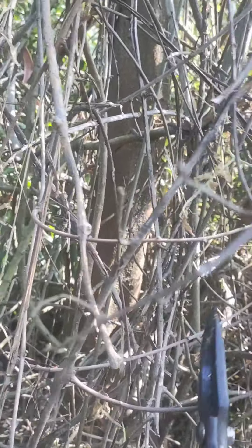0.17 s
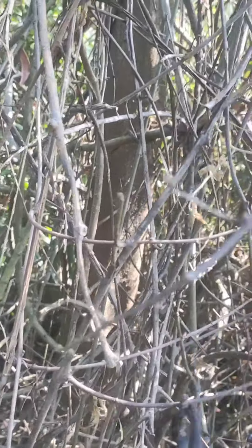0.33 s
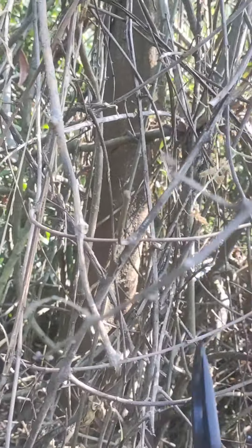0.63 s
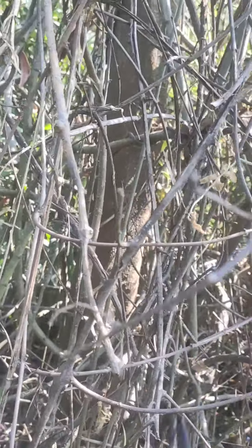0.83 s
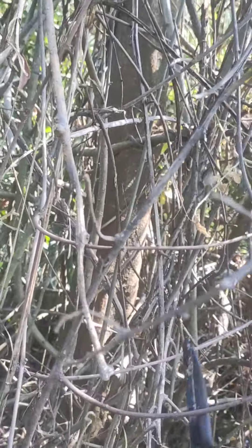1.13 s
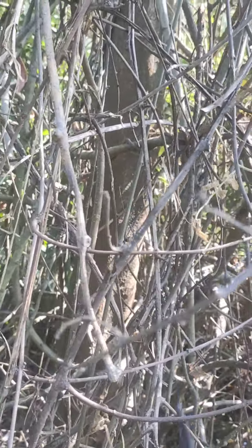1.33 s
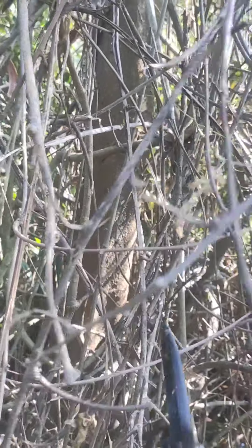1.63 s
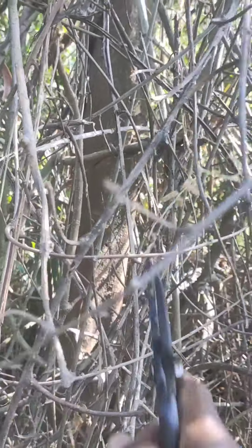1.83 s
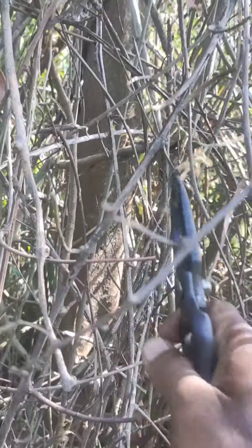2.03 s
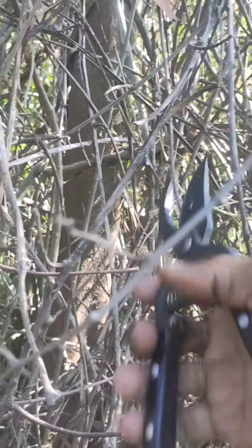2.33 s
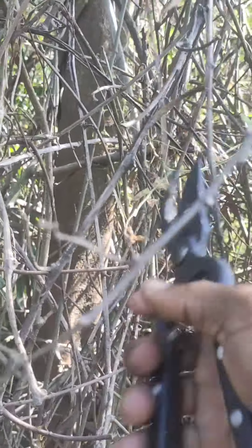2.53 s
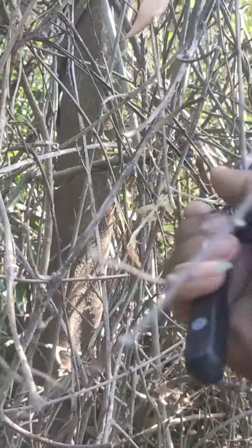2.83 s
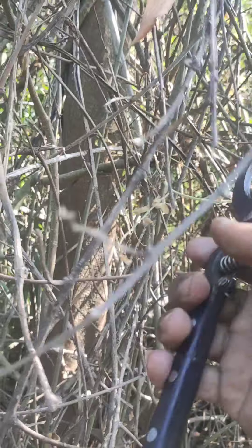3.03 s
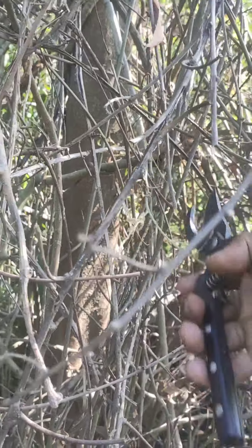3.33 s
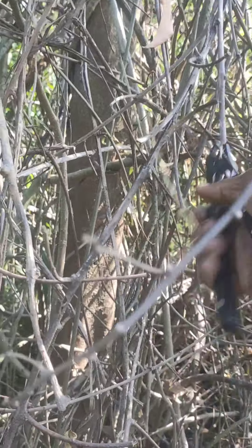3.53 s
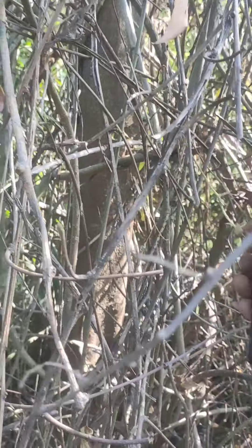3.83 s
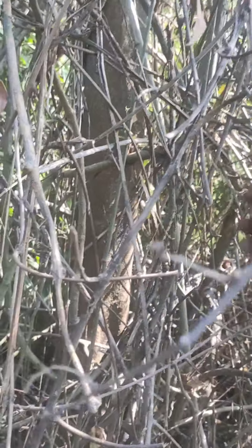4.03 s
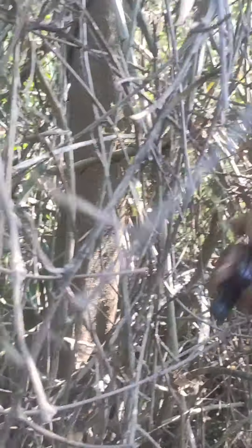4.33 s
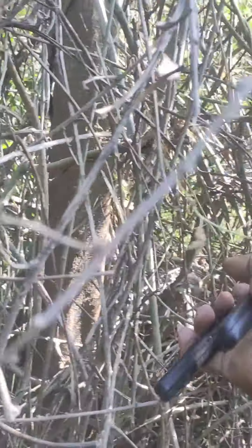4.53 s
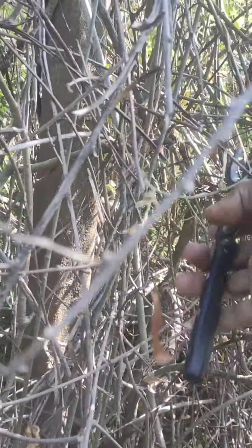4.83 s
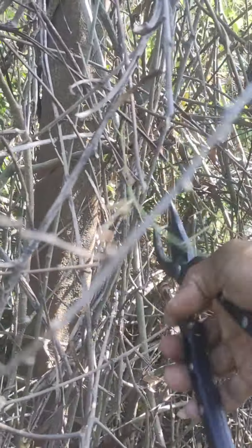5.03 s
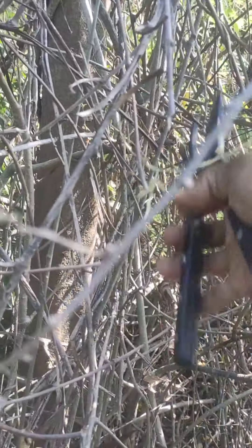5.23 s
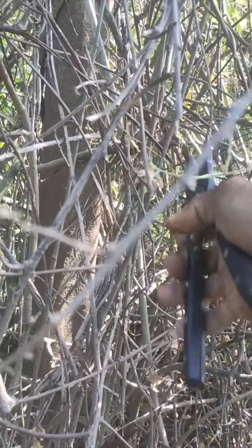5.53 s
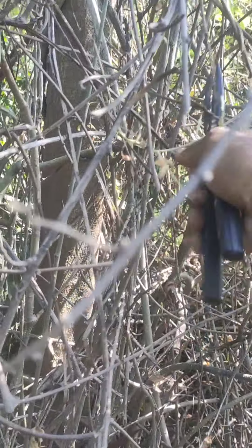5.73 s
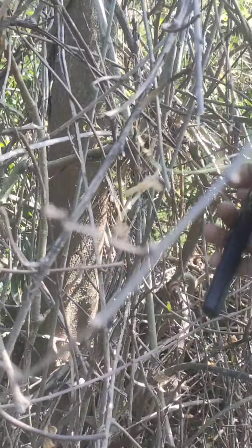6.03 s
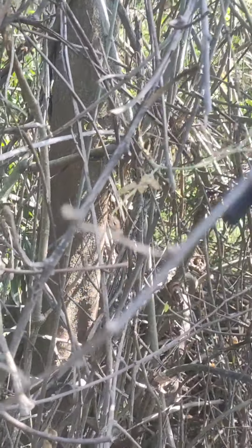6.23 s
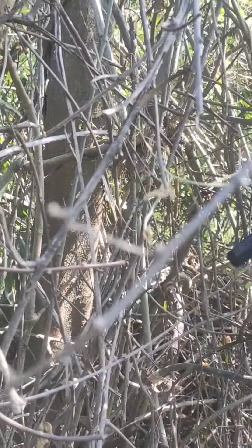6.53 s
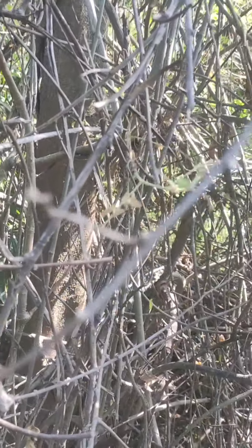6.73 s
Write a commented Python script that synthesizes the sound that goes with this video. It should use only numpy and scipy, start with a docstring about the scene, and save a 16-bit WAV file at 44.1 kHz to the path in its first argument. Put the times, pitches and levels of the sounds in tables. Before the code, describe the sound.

Bright, dry snips of pruning shears, recorded very near in dense dry brush. Three clean empty clacks come quickly, then nine more closings, mostly with small crunching bites and splitting wood just before the metal stops meet. Papery rustling swells between them, with scattered spring and twig ticks. A steady thin insect chorus fades slightly while a nearer pulsing buzz grows, then stops; faint open-air rumble underneath.

```python
"""In a thicket, hand shears snip twigs close to a two-port microphone.
Knocks (edge bites, wood cracks, handles clack shut and rebound) are noise bursts rung through damped modes.
Dry stems rustle as grainy noise; twigs and the coil spring tick; jolts thud; stems scatter a short tail.
Two insect songs, narrow bands of noise, lie over far rumble and hiss.
A gain control turns the sound down briefly after low-mid peaks such as thuds; the top band is limited."""
import sys
import numpy as np
from scipy import signal
from scipy.fft import rfft, irfft
from scipy.io import wavfile
from scipy.ndimage import uniform_filter1d, minimum_filter1d

SR = 44100
rng = np.random.default_rng(int(sys.argv[2]) if len(sys.argv) > 2 else 0)


def bounce(signal):
    """Save signal as a 16-bit WAV file at the path given by the first command-line argument."""
    frames = np.transpose(np.atleast_2d(signal))
    limited = np.clip(frames, -1, 1)
    pcm = np.round(limited * 32767).astype(np.int16)
    wavfile.write(sys.argv[1], SR, pcm)


N = 303849
BURST_SAMPLES, PEAK_SAMPLE = 2048, 768
BURST_HZ = np.fft.rfftfreq(BURST_SAMPLES, 1 / SR)


def amp(db):
    """Decibels to gain."""
    return 10 ** (np.asarray(db) / 20)


def evened(x):
    """Scales to rms 1."""
    return x / np.sqrt(np.mean(x ** 2) + 1e-20)


def read_spectrum(points, hz):
    """Interpolates a spectrum table over log frequency."""
    f, value = np.transpose(points)
    return np.interp(np.log(hz + 1), np.log(f + 1), value)


def level_curve_db(rows):
    """A (time, level) table at every sample."""
    s, db = np.transpose(rows)
    return np.interp(np.arange(N) / SR, s, db)


def band(hz, centre_hz, width_hz, steepness):
    """Response of a damped mode, raised to a power."""
    damping = 1j * hz * width_hz
    return (damping / (centre_hz ** 2 - hz ** 2 + damping)) ** steepness


# left-right likeness of steady noise: (frequency [Hz], likeness [0-1])
NOISE_LIKENESS = [(130, .95), (290, .86), (640, .66), (1410, .21), (3100, 0)]


def noise(gain, patchy_db, size):
    """Stereo noise, rms 1: random short-time spectra with drifting patches; gain is a function of Hz."""
    frames, hz = 4 * N // size + 5, np.fft.rfftfreq(size, 1 / SR)
    a, b, c, d, patches = rng.standard_normal((frames, len(hz), 5)).T
    patches = uniform_filter1d(patches, size=9, axis=0)  # over frequency
    patches = evened(uniform_filter1d(patches, size=12, axis=1))  # over time
    same = read_spectrum(NOISE_LIKENESS, hz)[:, None]
    left = a + 1j * b
    right = same * left + np.sqrt(1 - same ** 2) * (c + 1j * d)
    spectra = np.array([left, right]) * gain(hz)[:, None] * amp(patchy_db * patches)
    return evened(signal.istft(spectra, nperseg=size, noverlap=size * 3 // 4)[1][:, :N])


def bursts(rise_ms, t60_ms, ring, same, db, pan_db, spiky_db=5, step_db=6, snap=7):
    """Tiny slips swell (60 dB per rise), snap and die away, heard through ring; one stereo burst a row."""
    ms = (np.arange(BURST_SAMPLES) - PEAK_SAMPLE) * 1000 / SR
    stroke_db = np.where(ms < 0, 60 * ms / rise_ms - step_db, -60 * ms / t60_ms)
    a, b, grain = rng.standard_normal((len(db), 3, BURST_SAMPLES)).transpose(1, 0, 2)
    slips = amp(stroke_db) * amp(spiky_db * evened(uniform_filter1d(grain, size=12)))
    left = a + snap * (ms == 0)  # the moment the fibres or stops give
    right = same * left + np.sqrt(1 - same ** 2) * b
    sound = irfft(rfft(slips * np.array([left, right])) * ring)
    around_peak = sound[..., PEAK_SAMPLE - 25:PEAK_SAMPLE + 105]
    sound /= np.sqrt(np.mean(around_peak ** 2, -1, keepdims=True))
    side_db = np.outer([.5, -.5], pan_db * np.ones(len(db)))
    return sound * amp(db + side_db)[..., None]


def placed(times, sounds):
    """Lays bursts out with their peaks at the given times."""
    out = np.zeros((2, N + BURST_SAMPLES))
    for k, s in enumerate(times):
        out[:, round(s * SR):][:, :BURST_SAMPLES] += sounds[:, k]
    return out[:, PEAK_SAMPLE:PEAK_SAMPLE + N]


# relative spectrum of rumble and hiss: (frequency [Hz], density [dB per Hz])
AIR_SPECTRUM = [(20, -6.5), (35, -22), (60, 0.5), (110, -4), (200, -13), (400, -19), (735, -25.5),
                (1100, -23), (2300, -27.5), (5000, -30.5), (16000, -50)]
AIR_DB = -55.5


def open_air():
    """Far rumble and hiss: steady shaped noise."""
    return amp(AIR_DB) * noise(lambda hz: amp(read_spectrum(AIR_SPECTRUM, hz)) * (hz > 15),
                               patchy_db=1.0, size=2048)


# far insects: (time [s], level [dB])
CHORUS_LEVEL = [(0, -57), (2.7, -61.5), (6.89, -63.5)]
# a nearer insect: (time [s], level [dB])
SINGER_LEVEL = [(0, -73.5), (2.1, -75.5), (2.25, -70.5), (3.3, -67.5), (4.4, -62.5), (6.15, -57.5),
                (6.25, -70), (6.89, -82)]


def insect(rows, centre_hz, width_hz, throb_hz, throb_db, peak_s, buzz_hz, buzz_db):
    """A narrow band of noise that throbs and buzzes with the wing strokes."""
    song = noise(lambda hz: np.exp(-((hz - centre_hz) / width_hz) ** 4), patchy_db=.5, size=512)
    turn = 2 * np.pi * (np.arange(N) / SR - peak_s)
    beat_db = throb_db * np.cos(throb_hz * turn) + buzz_db * np.sin(buzz_hz * turn)
    return amp(level_curve_db(rows)) * song * evened(amp(beat_db))


# swishes as the shears spring open:
# (loudest time [s], dull level [dB], bright level [dB], 10 dB rise [s], 10 dB fall [s]); signs of rise, fall unused
OPENING_SWISHES = [(0.347, -55, -50.5, 0.16, 0.0545), (0.746, -54, -50, -0.09, 0.018),
                   (1.125, -47, -46, 0.07, -0.0128), (1.72, -54, -47.5, 0.1, 0.13),
                   (2.163, -58, -49.5, 0.25, -0.4568), (2.572, -49, -43, 0.0611, 0.1035),
                   (3.051, -54, -46, 0.1478, 0.0954), (3.779, -59.5, -54, -0.16, 0.57),
                   (4.338, -49, -42.5, 0.2584, 0.1735), (5.47, -58, -45.5, -0.1179, 0.01),
                   (5.964, -56, -49, 0.05, 0.0544), (6.468, -50, -43, 0.0458, 0.1621)]
# hand against stems: same columns
BRUSH_SWISHES = [(0.002, -53, -52, .05, 0.173), (3.465, -53.5, -48.5, 0.145, 0.068),
                 (4.692, -54, -49, 0.0123, 0.089), (4.817, -63, -50.5, 0.13, 0.0264),
                 (6.114, -61.5, -55.5, 0.044, 0.11), (6.887, -48.5, -47, 0.0818, .05)]
# rustle that never stops: dull, bright level [dB]
STILL_RUSTLE_DB = [-69, -65.5]
# swishes before and after each clack; bright level relative to dull
CLOSING_S, CLOSING_BRIGHT_DB, CLOSING_RISE_S, CLOSING_FALL_S = -0.0215, 2.5, 0.1037, 0.066
SHAKEN_S, SHAKEN_BRIGHT_DB, SHAKEN_RISE_S, SHAKEN_FALL_S = 0.0299, 3.5, 0.0557, 0.0287


def rustle_level():
    """Dull and bright gain over time: swishes swell and fade, adding power to the steady rustle."""
    rows = OPENING_SWISHES + BRUSH_SWISHES
    for s, *_, before_db, after_db in CLACK_ROWS:
        rows = rows + [
            (s + CLOSING_S, before_db, before_db + CLOSING_BRIGHT_DB, CLOSING_RISE_S, CLOSING_FALL_S),
            (s + SHAKEN_S, after_db, after_db + SHAKEN_BRIGHT_DB, SHAKEN_RISE_S, SHAKEN_FALL_S)]
    t = np.arange(0, N / SR, 1 / 500)
    power = amp(STILL_RUSTLE_DB)[:, None] ** 2
    for s, dull_db, bright_db, rise_s, fall_s in rows:
        down_db = 10 * np.where(t < s, (s - t) / abs(rise_s), (t - s) / abs(fall_s))
        power = power + amp(np.array([[dull_db], [bright_db]]) - down_db) ** 2
    return [np.interp(np.arange(N) / SR, t, np.sqrt(p)) for p in power]


# relative rustle spectra: (frequency [Hz], density [dB per Hz])
DULL_SPECTRUM = [(900, -39.5), (2000, -2.5), (3000, -1.5), (5000, -7), (7000, -3.5), (9500, -23.5)]
BRIGHT_SPECTRUM = [(5000, -24), (7500, -4), (10500, -8.5), (13500, -7), (15000, -6.5)]


def stems(grain_db=2.5, grains_per_s=150., grain_decay_samples=82.7):
    """Rustle: patchy noise roughened by the short scrapes of single stems."""
    strength_db = grain_db * np.minimum(rng.exponential(1, N), 4)
    scrapes = (rng.random(N) < grains_per_s / SR) * amp(strength_db)
    decaying = signal.lfilter([1], [1, -np.exp(-1 / grain_decay_samples)], scrapes)
    grain = evened(1 + decaying)
    dull_gain, bright_gain = rustle_level()
    dull = dull_gain * noise(lambda hz: amp(read_spectrum(DULL_SPECTRUM, hz)), patchy_db=1.5, size=256)
    bright = bright_gain * noise(lambda hz: amp(read_spectrum(BRIGHT_SPECTRUM, hz)), patchy_db=3.0, size=256)
    return grain * (dull + bright)


# ticks of the coil spring: (time [s], level [dB])
SPRING_TICKS = [(0.0354, -42.5), (0.0607, -44.5), (0.1702, -40), (0.564, -39), (0.831, -46), (0.9543, -41),
                (0.9611, -42), (1.4132, -45), (6.794, -44.5)]
SPRING_HZ, SPRING_WIDTH_HZ, SPRING_PAN_DB = 6710, 410, -10.5
# ticks of twigs: (time [s], level [dB], ring [Hz])
TWIG_TICKS = [(1.5683, -37.5, 5800), (2.1699, -45, 12800), (2.5351, -30.5, 7400), (2.609, -45, 2400),
              (2.6396, -46, 2680), (2.683, -48.5, 9000), (2.7104, -48, 9860), (2.9369, -44, 11630),
              (4.323, -42.5, 7000), (4.4912, -46, 2600), (4.6097, -47, 6550), (4.6871, -49.5, 5340),
              (4.828, -51, 2560), (5.0842, -43.5, 7160), (5.1011, -45, 7130), (5.1138, -36.5, 15800),
              (5.1484, -40.5, 15100), (5.1645, -48, 6560), (6.29, -42.5, 8010), (6.467, -39, 9200)]
TWIG_WIDTH_HZ, TWIG_PAN_DB = 2590, -5.5


def ticks():
    """Spring and twigs: a brief ring over a faint broad click."""
    rows = [(*row, SPRING_HZ, SPRING_WIDTH_HZ, SPRING_PAN_DB) for row in SPRING_TICKS]
    rows += [(*row, TWIG_WIDTH_HZ, TWIG_PAN_DB) for row in TWIG_TICKS]
    s, db, centre_hz, width_hz, pan_db = np.transpose(rows)
    ring = band(BURST_HZ, centre_hz[:, None], width_hz[:, None], steepness=1.37)
    click = amp(-15.0) * band(BURST_HZ, 4960.0, 12000.0, steepness=1.13)
    click = click * np.sqrt(width_hz[:, None] / 1000)
    return placed(s, bursts(8.8, 22.2, ring + click, 0.056, db, pan_db))


# stops meet as the shears shut: (time [s], handle [dB], blade [dB], edge [dB], t60 [ms], tilt [dB per mode],
# rebound [dB], jolt of the branch [dB], dull rustle before [dB], dull rustle after [dB])
CLACK_ROWS = [(0.1866, -19, -23, -38, 9, -3, -33, -75.5, -53, -69),
              (0.5783, -24.5, -27.5, -29, 6.8, 0, -39.5, -75.5, -52.5, -70),
              (0.985, -18.5, -26.5, -58.5, 8, -3, -31.5, -74.5, -53.5, -62.5),
              (1.6201, -27.5, -17, -33, 5.9, -3.5, -36.5, -49.5, -62, -50),
              (2.0125, -19.5, -17.5, -25.5, 4.7, -1.2, -28.5, -44, -55, -52.5),
              (2.4472, -22, -19.5, -24, 7.85, 0.7, -31, -40, -55, -46),
              (2.8678, -26, -20, -24.5, 22.4, -5, -36, -52, -57.5, -58),
              (3.601, -22.5, -27, -20, 10.1, -0.8, -41.5, -43.5, -55.5, -44.5),
              (4.2219, -22.5, -15.5, -23, 26.9, 2.5, -40.5, -63, -55.5, -48),
              (5.335, -21.5, -20, -22.5, 20.6, -4, -42.5, -55.5, -61, -51.5),
              (5.7964, -20, -18, -24.5, 14.4, 0.58, -31, -57.5, -61.5, -45),
              (6.3211, -34.5, -20.5, -25, 22, -4, -27.5, -56.5, -64, -53)]


def thuds():
    """A short low push as the branch jolts."""
    s, *_, jolt_db, _, _ = np.transpose(CLACK_ROWS)
    push = band(BURST_HZ, 330., 700., steepness=1)
    return placed(s, bursts(5.0, 5.3, push, 0.876, jolt_db, -8.0))


# wood splits: (time [s], handle [dB], blade [dB], edge [dB], t60 [ms])
CRACK_ROWS = [(1.6115, -34.5, -21.5, -23.5, 16.3), (1.614, -30.5, -18, -28, 13.1),
              (2.002, -33, -22, -24, 33.6), (2.0056, -31, -30, -28.5, 8.9),
              (2.4419, -29.5, -17.5, -20, 14.8), (2.8559, -32, -19.5, -20, 8.8),
              (2.859, -27.5, -17, -19.5, 21.5), (3.5959, -33.5, -25.5, -26.5, 21.5),
              (4.206, -34, -26.5, -18.5, 14.9), (5.7902, -25, -19, -22.5, 20.4)]
# edge bites and slips in the bark: same columns
BITE_ROWS = [(1.581, -39, -31.5, -34.5, 11.2), (1.5945, -41, -44, -33.5, 50),
             (1.9758, -47.5, -40.5, -42.5, 10.5), (1.98, -37, -29.5, -31, 15),
             (1.9877, -35, -46.5, -32, 64), (2.404, -40, -30.5, -28, 16), (2.408, -37.5, -44.5, -32, 12.7),
             (2.418, -51, -41.5, -40.5, 12), (2.4318, -42, -36, -31, 26), (2.8401, -40, -33, -28, 13),
             (3.5695, -52.5, -34, -30, 19.6), (3.579, -35.5, -39, -24, 15.4),
             (4.1891, -39.5, -29.5, -32.5, 26.4), (5.3179, -34.5, -32.5, -35, 46),
             (5.761, -29.5, -28.5, -25, 16.2), (5.7759, -37, -39, -32.5, 39),
             (5.7854, -33.5, -35, -24.5, 13.3), (6.2991, -44, -42.5, -35.5, 46.3)]
# by kind: (tilt [dB per mode], left-right [dB], 60 dB rise [ms])
REBOUND, CRACK, BITE = (-1.4, 2.74, 21.5), (1.16, 3.42, 20.7), (0.81, 2.26, 13.1)
CLACK_PAN_DB, CLACK_RISE_MS = 0.66, 5.8
# blade and edge against the handle
REBOUND_S, REBOUND_T60_MS, REBOUND_BLADE_DB, REBOUND_EDGE_DB = 0.006, 28.6, -3, -21.5
# fibres crush around each bite and crack; level against it
CRUSH_DB, CRUSH_RISE_MS, CRUSH_T60_MS = -14.5, 52, 72


def knocks():
    """Rows (time [s], handle, blade, edge [dB], tilt [dB per mode], left-right [dB], rise, t60 [ms])."""
    rows = []
    for s, handle_db, blade_db, edge_db, t60_ms, tilt_db, rebound_db, *_ in CLACK_ROWS:
        rows.append((s, handle_db, blade_db, edge_db, tilt_db, CLACK_PAN_DB, CLACK_RISE_MS, t60_ms))
        rows.append((s + REBOUND_S, rebound_db, rebound_db + REBOUND_BLADE_DB,
                     rebound_db + REBOUND_EDGE_DB, *REBOUND, REBOUND_T60_MS))
    rows += [(*row, *CRACK, t60_ms) for *row, t60_ms in CRACK_ROWS]
    rows += [(*row, *BITE, t60_ms) for *row, t60_ms in BITE_ROWS]
    for s, *levels_db, _ in CRACK_ROWS + BITE_ROWS:
        rows.append((s, *(np.array(levels_db) + CRUSH_DB), *BITE[:-1], CRUSH_RISE_MS, CRUSH_T60_MS))
    return np.array(rows)


# modes of twig, handle, blade, edge; each a list of (frequency [Hz], width [Hz], level [dB]),
# frequency and level being means that each knock varies
PART_MODES = [
    [(742, 1420, -9.5), (1106.5, 82.6, 7.5), (1568, 637, 2)],
    [(2720, 520, 0), (3200, 520, -1), (3850, 700, -4)],
    [(5254, 2190, -5), (6602, 839, 7), (7260, 1460, 2.5), (9000, 656, -2)],
    [(9590, 3790, -2.5), (12280, 2300, -4), (14730, 513, 1)],
]
# left-right likeness [-1 to 1] by part; the handle swings between the ports
PART_LIKENESS = [0.698, -0.6065, -0.233, -0.069]
# left-right level [dB] by part; blade and edge add the knock's own
PART_PAN_DB = [-5.5, -9.5, 2, -3]


def shears(detune=0.0355, uneven_db=1.5, twig_db=-21.):
    """Each knock shakes twig, handle, blade and edge through their modes; grip and place of blow vary them."""
    rows = knocks()
    s, handle_db, blade_db, edge_db, tilt_db, knock_pan_db, rise_ms, t60_ms = rows.T
    levels_db = [edge_db + twig_db, handle_db, blade_db, edge_db]  # the twig follows the edge
    sounds = 0
    for part, modes in enumerate(PART_MODES):
        grip, place = rng.standard_normal((len(rows), 2, len(modes), 1)).transpose(1, 2, 0, 3)
        part_tilt_db = tilt_db[:, None] * (part in (1, 2))  # handle and blade only
        ring = 0
        for k, (f, width_hz, db) in enumerate(modes):
            gain = amp(db + k * part_tilt_db + uneven_db * place[k])
            mode = band(BURST_HZ, f * (1 + detune * grip[k]), width_hz, steepness=1.283)
            ring = ring + (-1) ** k * gain * mode  # signs alternate
        pan_db = PART_PAN_DB[part] + knock_pan_db * (part > 1)
        sounds = sounds + bursts(rise_ms[:, None], t60_ms[:, None], ring, PART_LIKENESS[part],
                                 levels_db[part], pan_db)
    return placed(s, sounds)


def thicket(x, t60_s=.13, centre_hz=7000., width_hz=7000.):
    """Stems all round scatter the sound back as a short sparse tail."""
    t = np.arange(SR // 5) / SR
    sparse = rng.standard_normal((2, len(t))) * (rng.random((2, len(t))) < .15)
    taps = sparse * amp(-60 * t / t60_s) * (t > .004)
    taps = irfft(rfft(taps) * band(np.fft.rfftfreq(len(t), 1 / SR), centre_hz, width_hz, steepness=2.27))
    return signal.oaconvolve(x, taps / np.linalg.norm(taps[0]), axes=1)[:, :N]


def scene():
    """Shears, stems and insects in open air."""
    chorus = insect(CHORUS_LEVEL, centre_hz=7498, width_hz=510, throb_hz=0, throb_db=0, peak_s=0,
                    buzz_hz=90., buzz_db=0.94)
    singer = insect(SINGER_LEVEL, centre_hz=9080, width_hz=380, throb_hz=9.57, throb_db=4, peak_s=5.43,
                    buzz_hz=130., buzz_db=3.)
    background = open_air() + chorus + singer
    near = ticks() + shears()
    return background + stems() + thuds() + near + amp(-22) * thicket(near)


DROP_HZ, EDGE_HZ = 15850, 16850  # the top of the band steps down, then ends


def record(dry, low_hz=200.4, high_hz=709.6, knee_db=-55.0, slope=1.226, most_db=10.5):
    """Gain control follows low-mid power, turns down just after a peak, holds, springs back; then band limit."""
    lag, hold, slide = 600, 3300, 500  # samples
    low_mid = signal.butter(2, [low_hz, high_hz], "band", fs=SR, output="sos")
    power = uniform_filter1d(signal.sosfilt(low_mid, dry.mean(0)) ** 2, size=300)
    power_db = 10 * np.log10(abs(power) + 1e-12)
    cut_db = np.clip(slope * (power_db - knee_db), 0, most_db)
    late_db = np.pad(cut_db, (hold // 2 + lag, 0))
    held_db = -minimum_filter1d(-late_db, hold)[:N]  # running maximum
    ducked = dry / amp(uniform_filter1d(held_db, slide))
    drop, edge = (signal.firwin(511, hz, window=("kaiser", 9), fs=SR)[None] for hz in (DROP_HZ, EDGE_HZ))
    share = amp(-26.5)  # what passes above the step
    stepped = share * ducked + (1 - share) * signal.oaconvolve(ducked, drop, "same")
    return signal.oaconvolve(stepped, edge, "same")


dry = scene()
out = record(dry)
bounce(out)
```